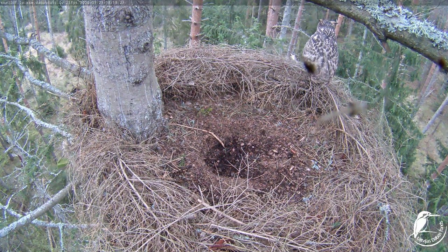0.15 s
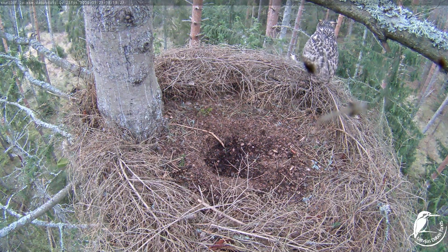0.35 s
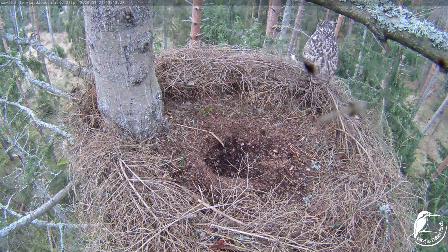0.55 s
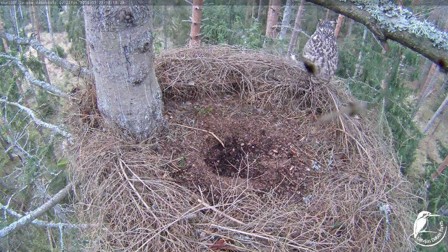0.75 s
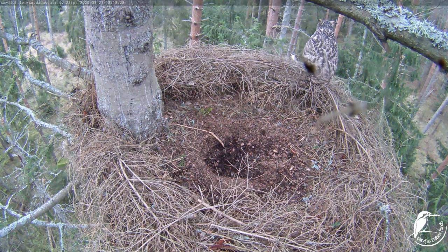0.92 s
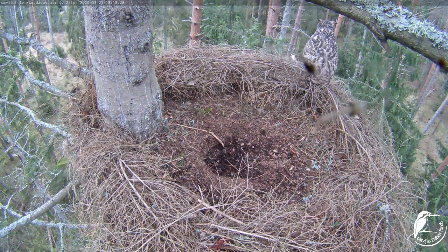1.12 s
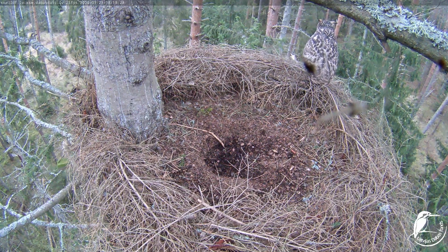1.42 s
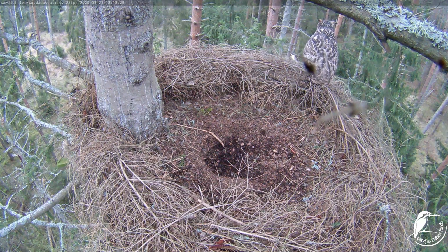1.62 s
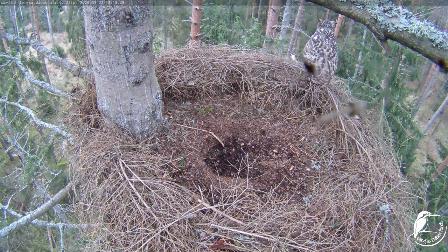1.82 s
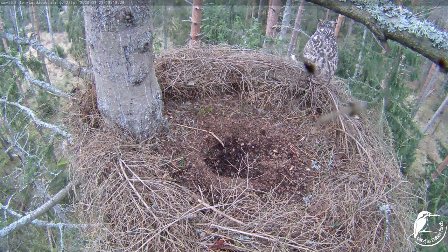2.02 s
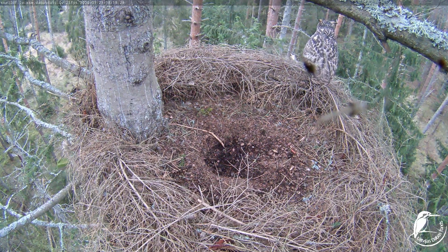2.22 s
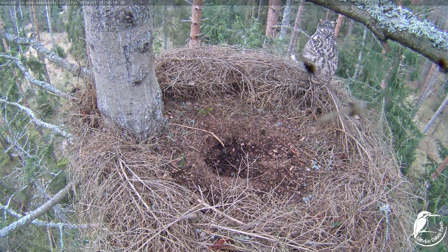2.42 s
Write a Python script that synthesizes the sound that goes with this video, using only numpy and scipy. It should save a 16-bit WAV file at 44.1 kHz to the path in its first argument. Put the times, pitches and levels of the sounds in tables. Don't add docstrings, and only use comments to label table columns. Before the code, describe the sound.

Single mellow owl hoot slides up, holds, falls away, with faint woodland echo over soft hiss

```python
import sys
import numpy as np
from scipy import signal
from scipy.fft import rfft, irfft, next_fast_len
from scipy.io import wavfile
from scipy.ndimage import uniform_filter1d, map_coordinates

SR = 44100
rng = np.random.default_rng(int(sys.argv[2]) if len(sys.argv) > 2 else 0)


def unload_audio(sound):
    columns = np.transpose(np.atleast_2d(sound))
    steps = np.round(np.clip(columns, -1, 1) * 32767)
    wavfile.write(sys.argv[1], SR, steps.astype(np.int16))


def decibels_to_gain(level_db):
    exponent = np.asarray(level_db, float) / 20
    return 10 ** exponent


N = 112454

# freq_hz, density_db (per Hz)
WIND_SPECTRUM = [(3, 4), (8, 5), (22, -8), (45, -12), (100, -12), (200, -16), (400, -49), (900, -120)]
WIND_DB, GUST_DB = -57.5, 1.5

# freq_hz, density_db (per Hz)
HISS_SPECTRUM = [(60, -55), (250, 1.5), (1500, -4.5), (3700, -5), (4300, -8.5), (6900, -11.5), (7550, -25),
                 (7950, -54.5)]
HISS_DB = -62.5
# pitch_hz, level_db (rms)
WHINE_TONES = [(3166, -85), (6335, -83.5)]
CONVERTER_NOISE_DB = -95.5

# centre_s, length_s, loss_db
DROPOUTS = [
    (.887, .012, 14),
    (.929, .014, 14),
    (1.769, .03, 24),
]
DROPOUT_ABOVE_HZ, DROPOUT_EDGE_S = 650, 0.015
# pitch_hz,
# centre_s, length_s, level_db
RINGING_TONES = [(820, 1.76, 0.049, -70.5), (1174, 1.775, 0.062, -74), (1770, 1.765, .04, -76),
                 (2650, 1.755, 0.026, -68), (2840, 1.775, 0.028, -73), (3910, 1.778, .022, -68),
                 (6335, 1.772, 0.037, -80), (446, 2.7, 0.019, -85.5), (1500, .887, 0.036, -77),
                 (2000, .885, 0.023, -72), (3350, .887, 0.043, -70.5), (6335, .885, 0.023, -73),
                 (975, .93, 0.069, -74), (1680, .93, 0.05, -73), (2500, .93, 0.027, -68.5),
                 (2910, .93, 0.04, -71), (6335, .93, .03, -79)]

# freq_hz, level_db
ECHO_COLOUR = [(250, -12), (390, -12), (422, 0), (1000, -3)]
# freq_hz, t60_s
TRUNK_DECAY = [(200, 1.2), (450, 1.75), (1000, .7), (3000, .4)]
TRUNKS_DB, TRUNKS_DELAY_S = -25, .16
SLOPE_DB, SLOPE_DELAY_S = -22, .1512

# time_s, pitch_hz
HOOT_PITCH = [
    (.184, 225),
    (.193, 305),
    (.238, 439),
    (.325, 424),
    (.42, 437),
    (.442, 432),
    (.487, 382),
    (.52, 303),
    (.6, 294),
]
SAG_HZ_PER_S, SAG_HZ_PER_S3 = 370, 7000
FLUTTER_HZ = 0.92
# time_s, level_db
HOOT_EFFORT = [
    (.183, -54),
    (.203, -39),
    (.222, -32.3),
    (.245, -34.3),
    (.335, -31.8),
    (.42, -34.5),
    (.49, -33.5),
    (.522, -45.5),
    (.58, -44),
]
ATTACK_DB_PER_S = 2500
FADE_DB_PER_S, FADE_DB_PER_S2 = 41.5, 296.5
LOUD_DB, SHIMMER_DB = -33, .5

OVERTONE_LEVELS = [-26, -30.5, -27, -25.5, -31]
OVERTONE_GROWTH = [.12, .62, 2.5, 2.2, 2.5]
OVERTONE_WANE = [-8, -0.5, 0.5, 26, 1]
# freq_hz, level_db
THROAT_COLOUR = [(500, -4), (720, 2), (860, 0), (1080, -10), (1290, 0), (1550, -9), (2050, 2), (2400, -6)]
BITE_DB = 8
VEIL_DB = 15
UNSTEADY_DB = 1.4
OVERTONE_TOP_DB = -9
SIDE_HZ, SIDE_DB = 92.5, -34


def unit(x):
    return x / np.sqrt(np.mean(x ** 2) + 1e-20)


def along(points, hz):
    f, v = np.transpose(points)
    return np.interp(np.log(hz + 1), np.log(f + 1), v)


def curve(rows, smooth_s):
    s, v = np.transpose(rows)
    return uniform_filter1d(np.interp(np.arange(N) / SR, s, v), max(int(smooth_s * SR), 1))


def wobble(rate):
    knots = rng.standard_normal(int(N * rate / SR) + 4)
    return map_coordinates(knots, [np.arange(N) * rate / SR])


def filtered(x, response):
    m = next_fast_len(N + SR // 2)
    return irfft(rfft(x, m) * response(np.fft.rfftfreq(m, 1 / SR)), m)[:N]


def noise(spectrum):
    return unit(filtered(rng.standard_normal(N), lambda hz: decibels_to_gain(along(spectrum, hz))))


def wind():
    gusts = decibels_to_gain(GUST_DB * wobble(3.63))
    return decibels_to_gain(WIND_DB) * unit(gusts * noise(WIND_SPECTRUM))


def camera():
    t = np.arange(N) / SR
    bed = decibels_to_gain(HISS_DB + 0.16 * wobble(18)) * noise(HISS_SPECTRUM)
    for hz, db in WHINE_TONES:
        level = np.sqrt(2) * decibels_to_gain(db + 2.0 * wobble(15))
        bed = bed + level * np.sin(2 * np.pi * hz * t + 0.72 * wobble(15))
    treble = filtered(bed, lambda hz: 1 / (1 + (DROPOUT_ABOVE_HZ / (hz + 1)) ** 6))
    loss_db = np.zeros(N)
    for s, span, db in DROPOUTS:
        loss_db += db * np.clip((span / 2 - np.abs(t - s)) / DROPOUT_EDGE_S + .5, 0, 1)
    ringing = np.zeros(N)
    for hz, s, span, db in RINGING_TONES:
        swell = np.cos(np.pi * np.clip((t - s) / span, -.5, .5))
        ringing += np.sqrt(2) * decibels_to_gain(db) * swell * np.sin(2 * np.pi * hz * t)
    return bed - treble * (1 - decibels_to_gain(-loss_db)) + ringing


def forest(call):
    hz, t, grains = signal.stft(rng.standard_normal(SR), SR, nperseg=256)
    decay = decibels_to_gain(-60 * t / along(TRUNK_DECAY, hz)[:, None])
    tail = signal.istft(grains * decay, SR, nperseg=256)[1]
    tail = tail / np.sqrt(np.mean(np.abs(rfft(tail)[300:600]) ** 2))
    far = filtered(call, lambda f: decibels_to_gain(along(ECHO_COLOUR, f)))
    scattered = signal.fftconvolve(np.pad(far, (int(TRUNKS_DELAY_S * SR), 0)), tail)[:N]
    slope = np.pad(far, (int(SLOPE_DELAY_S * SR), 0))[:N] * decibels_to_gain(4 * wobble(45))
    return decibels_to_gain(TRUNKS_DB) * scattered + decibels_to_gain(SLOPE_DB) * slope


def owl():
    t = np.arange(N) / SR
    after_pitch = np.clip(t - HOOT_PITCH[-1][0], 0, None)
    sag = SAG_HZ_PER_S * after_pitch + SAG_HZ_PER_S3 * after_pitch ** 3
    hz = np.maximum(curve(HOOT_PITCH, .012) - sag, 20) + FLUTTER_HZ * wobble(33)

    after_effort = np.clip(t - HOOT_EFFORT[-1][0], 0, None)
    fade = FADE_DB_PER_S * after_effort + FADE_DB_PER_S2 * after_effort ** 2
    attack = ATTACK_DB_PER_S * np.clip(HOOT_EFFORT[0][0] - t, 0, None)
    db = curve(HOOT_EFFORT, 0.0033) - fade - attack + SHIMMER_DB * wobble(45)

    phase = 2 * np.pi * np.cumsum(hz) / SR
    second_vibration = decibels_to_gain(SIDE_DB + db - LOUD_DB) * np.sin(phase + 2 * np.pi * SIDE_HZ * t)
    voice = np.sin(phase) + second_vibration

    swelling = uniform_filter1d(1. * (t > HOOT_PITCH[1][0]) * (t < HOOT_EFFORT[2][0]), SR // 120)
    sliding_up = uniform_filter1d(1. * (t < HOOT_PITCH[2][0]), SR // 40)
    off_hold = sliding_up + np.clip((t - HOOT_PITCH[5][0]) / .12, 0, 1)
    overtones = zip(OVERTONE_LEVELS, OVERTONE_GROWTH, OVERTONE_WANE)
    for k, (level_db, growth, wane) in enumerate(overtones, start=2):
        own_db = level_db + (growth - 1) * (db - LOUD_DB) - wane * (t - HOOT_PITCH[3][0])
        own_db = own_db + along(THROAT_COLOUR, k * hz) + UNSTEADY_DB * wobble(29.2)
        if k == 2:
            own_db = own_db + BITE_DB * swelling
        if k > 3:
            own_db = own_db - VEIL_DB * off_hold
        voice = voice + decibels_to_gain(np.minimum(own_db, OVERTONE_TOP_DB)) * np.sin(k * phase)
    return np.sqrt(2) * decibels_to_gain(db) * voice


def scene():
    call = owl()
    return (wind() + camera() + forest(call) + call)[None]


def roll_off(x):
    return signal.sosfilt(signal.butter(12, 15700, fs=SR, output="sos"), x)


def record(dry):
    mix = dry + decibels_to_gain(CONVERTER_NOISE_DB) * rng.standard_normal(dry.shape)
    return roll_off(mix)


dry = scene()
out = record(dry)
unload_audio(out)
```